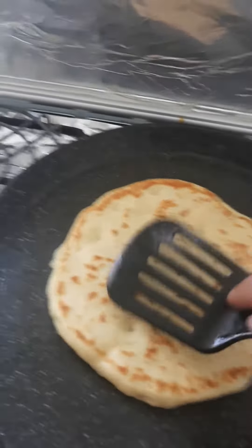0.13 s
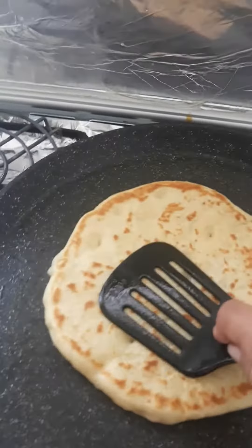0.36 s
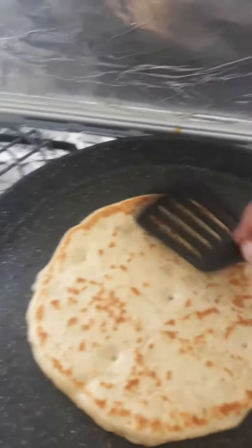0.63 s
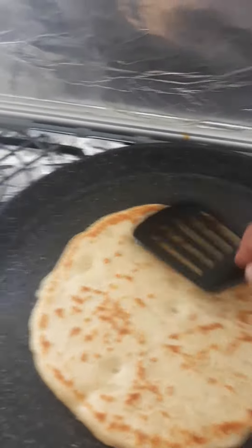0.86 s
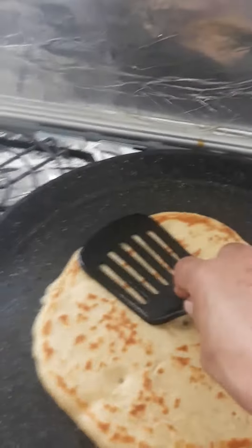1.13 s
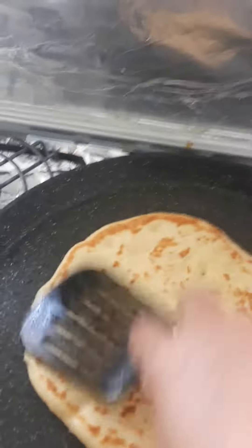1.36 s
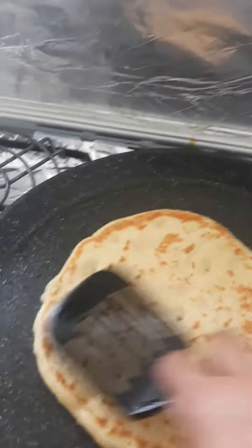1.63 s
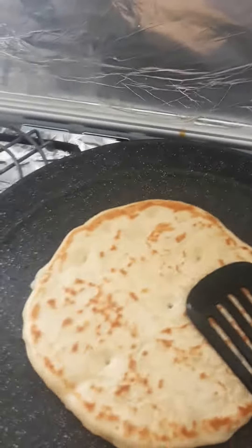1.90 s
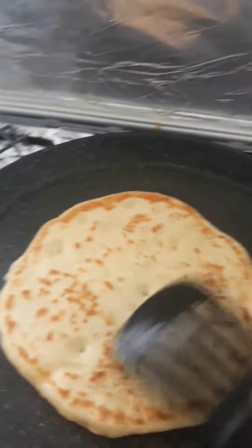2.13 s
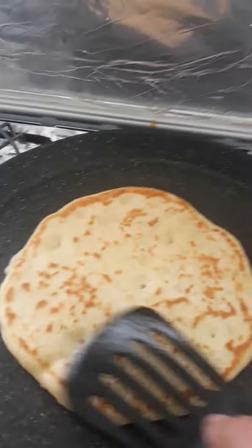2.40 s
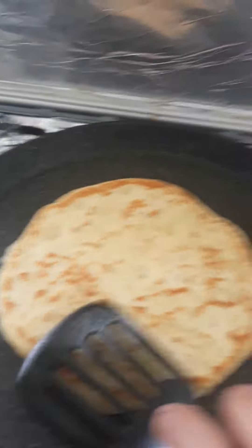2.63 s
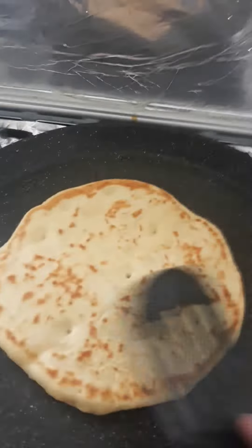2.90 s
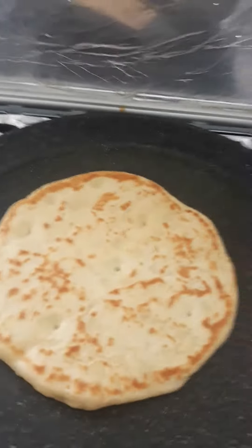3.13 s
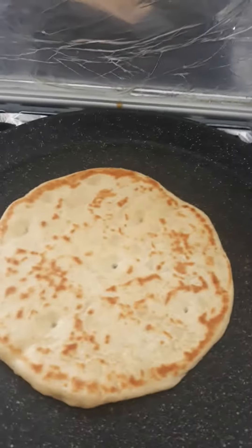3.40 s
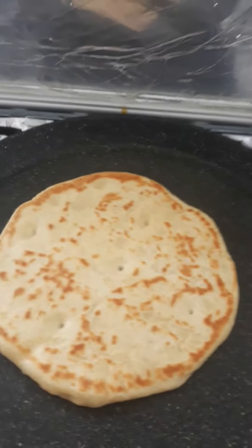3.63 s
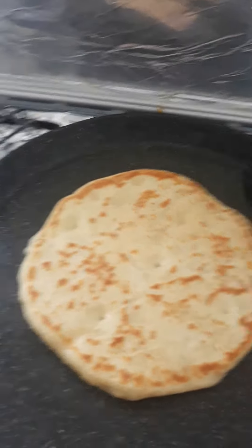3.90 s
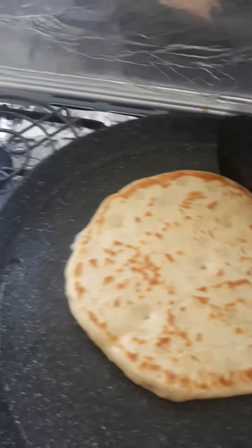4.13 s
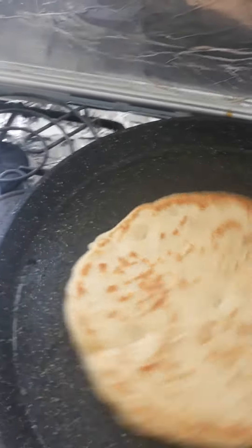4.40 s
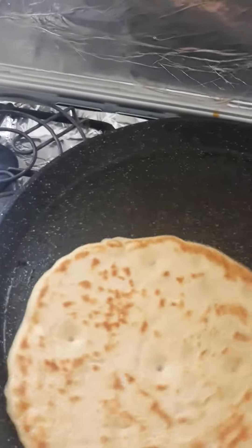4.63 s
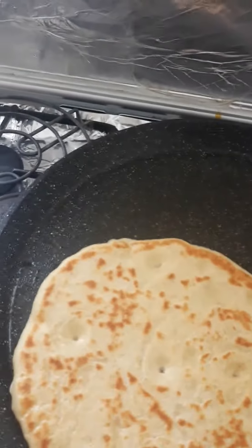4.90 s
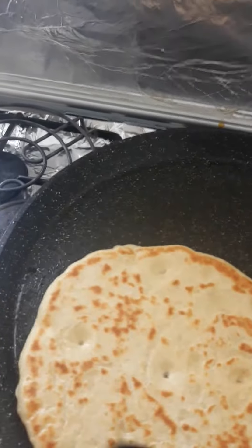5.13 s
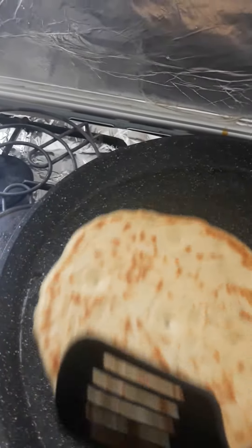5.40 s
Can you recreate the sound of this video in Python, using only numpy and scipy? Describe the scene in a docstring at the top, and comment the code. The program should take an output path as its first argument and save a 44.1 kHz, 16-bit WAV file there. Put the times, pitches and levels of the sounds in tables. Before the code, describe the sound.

Over a quiet steady gas burner, uneven spatula taps make a pan clack and ring briefly; later a jerk clangs it and the bread scrapes across.

```python
"""A gas burner roars and hisses in a small kitchen: two coloured noises share one slowly varying level.
A plastic spatula then pats a flatbread in a dry pan: the blade snaps on the crust (noise bursts), while the
pan rocks on its grate and rings (decaying modes); the hob top wobbles and blade and crust brush softly.
Then the pan is jerked: it knocks the grate and the bread slides over the coating (stick-slip noise)."""
import sys
import numpy as np
from scipy import signal
from scipy.fft import rfft, irfft, next_fast_len
from scipy.io import wavfile
from scipy.ndimage import uniform_filter1d, map_coordinates

SR = 44100
rng = np.random.default_rng(int(sys.argv[2]) if len(sys.argv) > 2 else 0)


def inscribe(sig):
    """Save sig as 16-bit PCM at rate SR to the path in sys.argv[1].

    A 1-D sig is mono; a 2-D sig holds one channel per row.
    Samples are clipped to [-1, 1] before scaling.
    """
    pcm = np.round(np.clip(np.atleast_2d(sig).T, -1, 1) * 32767)
    wavfile.write(sys.argv[1], SR, pcm.astype(np.int16))


def natural_amplitude(level_db):
    """Convert a level in decibels to a linear amplitude factor, elementwise."""
    exponent = np.asarray(level_db, float) / 20
    return 10 ** exponent


N = 243431


def unit(x):
    """Normalisation: the signal scaled to rms 1."""
    return x / np.sqrt(np.mean(x ** 2) + 1e-20)


def along(points, hz):
    """Logarithmic pitch: (frequency, value) points read on a log axis."""
    f, v = np.transpose(points)
    return np.interp(np.log(hz + 1), np.log(f + 1), v)


def curves(rows):
    """Linear interpolation: one value per sample for each column after the time."""
    s, *columns = np.transpose(rows)
    return [np.interp(np.arange(N) / SR, s, column) for column in columns]


def wobble(rate):
    """Band-limited fluctuation: a smooth random curve with rate knots a second."""
    knots = rng.standard_normal(int(N * rate / SR) + 4)
    return map_coordinates(knots, [np.arange(N) * rate / SR])


def coloured(x, spectrum):
    """Minimum-phase filtering: the folded cepstrum makes the given (frequency, dB) gain causal."""
    m = 2 * next_fast_len(x.shape[-1] // 2 + 4096)
    gain = natural_amplitude(along(spectrum, np.fft.rfftfreq(m, 1 / SR)))
    cepstrum = irfft(np.log(gain + 1e-6), m)
    cepstrum[1:m // 2] *= 2
    cepstrum[m // 2 + 1:] = 0
    return irfft(rfft(x, m) * np.exp(rfft(cepstrum)), m)[..., :x.shape[-1]]


def rush(spectrum, patchy_db):
    """Turbulence: noise of rms 1 whose gain varies at random in patches of time and frequency."""
    z = signal.stft(rng.standard_normal(N), nperseg=512)[2]
    field = uniform_filter1d(rng.standard_normal(z.shape), 5, 0)
    field = uniform_filter1d(field, 10, 1)
    patchy = signal.istft(z * natural_amplitude(patchy_db * unit(field)), nperseg=512)[1][:N]
    return unit(coloured(patchy, spectrum))


def grit(spread_db):
    """Stick-slip friction: dense tiny catches of unequal size."""
    size_db = spread_db * rng.standard_normal(N // 16 + 1).repeat(16)[:N]
    return unit(rng.standard_normal(N) * natural_amplitude(size_db))


# hiss level as heard from the moving microphone: (time [s], level [dB])
BURNER_LEVEL = [(0, -52.5), (.4, -52), (1.4, -50), (2.7, -50), (3.4, -50), (4.17, -51), (4.75, -54.5),
                (5.05, -53.5), (5.52, -47.5)]
# flame roar spectrum: (frequency [Hz], gain [dB])
ROAR_SPECTRUM = [(15, -36), (25, -11), (76, -8.5), (140, -5.5), (179, -7), (332, -3), (357, -11.5),
                 (393, -2), (560, -7), (800, -8), (1280, -14), (2200, -48.5), (2860, -37), (4840, -120)]
# gas jet spectrum: (frequency [Hz], gain [dB])
HISS_SPECTRUM = [(1060, -39.5), (1800, -7.5), (2310, -9), (2490, -6), (3130, -5.5), (3590, -1.5), (4240, 0),
                 (5150, -3.5), (6360, 0), (7440, -2.5), (8630, 1.5), (9640, -7), (14500, -4.5),
                 (15100, 0.5), (16300, -28.5)]
ROAR_DB = -3  # roar re hiss


def burner():
    """Turbulent combustion and jet noise: a low flame roar and steadier gas hiss follow one level."""
    level_db, = curves(BURNER_LEVEL)
    roar_db = level_db + ROAR_DB + .6 * wobble(7) + .8 * wobble(2)
    roar = natural_amplitude(roar_db) * rush(ROAR_SPECTRUM, patchy_db=1.3)
    hiss_db = level_db + 0.44 * wobble(5.38)
    return roar + natural_amplitude(hiss_db) * rush(HISS_SPECTRUM, patchy_db=1.0)


def ring(modes, t, weight_db, damping, attack, pressed_db=-40):
    """Modal decay: modes struck at random strengths die freely, plus a pressed part dying four times faster."""
    hz, db, t60 = np.transpose(modes)[:, :, None]
    strength, phase = rng.standard_normal((2, len(modes), 1))
    size = natural_amplitude(db + weight_db(hz) + 2 * strength)
    fall_db = -60 * t / (t60 * np.clip(damping, .05, 1.5))
    # pressed_db is the pressed part's starting level re the free part
    decay = (natural_amplitude(fall_db) + natural_amplitude(pressed_db + 4 * fall_db)) / (1 + natural_amplitude(pressed_db))
    tones = size * decay * np.sin(2 * np.pi * hz * t + .3 * phase)
    return tones.sum(0) / np.linalg.norm(size) * (1 - np.exp(-t / attack))


def chatter(x, t, level_db, t60):
    """Repeated impact: a blow is followed by a quick blur of smaller rebounds."""
    blows = natural_amplitude(level_db - 60 * t / t60) * rng.standard_normal(len(t))
    blows[0] = 1
    return signal.fftconvolve(x, blows / np.linalg.norm(blows))[:len(t)]


# a small pan sends out little bass: (frequency [Hz], gain [dB])
SMALL_RADIATOR = [(40, -35), (120, -33), (190, 0)]


def radiated(x):
    """Radiation efficiency: a source small beside the wavelength radiates weakly."""
    return coloured(x, SMALL_RADIATOR)


# the pan floor bumping on the grate, level before radiation:
# (time [s], level [dB], centre [Hz], share of free ringing time [0-1])
FLOOR_BUMPS = [(0.214, -19, 600, 0.09), (0.26, -28, 640, 0.13), (0.282, -28, 252, 0.13),
               (0.324, -31, 302, 0.7), (0.423, -22, 227, 0.75), (0.445, -19, 270, 0.47),
               (0.462, -25, 233, 0.54), (0.703, -24, 357, 0.42), (0.734, -32.5, 242, 0.72),
               (1.074, -13, 368, 0.12), (1.101, -32.5, 207, 0.28), (1.442, -34.5, 253, 0.6),
               (1.469, -26, 589, 0.32), (1.486, -5.5, 614, 0.52), (1.496, -9, 242, 0.63),
               (1.513, -10, 234, 0.23), (1.627, -9.5, 328, 0.67), (1.65, -9.5, 212, 0.14),
               (1.692, -19, 405, 0.43), (1.826, -34, 248, 0.5), (1.871, -19.5, 307, 0.16),
               (1.893, -26.5, 274, 0.6), (2.244, -21.5, 418, 0.17), (2.267, -25.5, 256, 0.27),
               (2.36, -24, 233, 0.18), (2.52, -28.5, 302, 0.3), (2.582, -22, 320, 0.55),
               (2.619, -23.5, 284, 0.19), (2.714, -17, 250, 0.06), (2.777, -20, 250, 0.74),
               (2.813, -20, 220, 0.67), (2.842, -33, 220, 0.1), (2.988, -29.5, 234, 0.15),
               (3.26, -31.5, 330, 0.13), (4.106, -37, 383, 0.4), (4.191, -9.5, 330, 0.32),
               (4.202, -13, 206, 1), (5.029, -20, 420, 0.44), (5.057, -16.5, 330, 0.12),
               (5.098, -23.5, 235, 0.3), (5.113, -31.5, 255, 0.95), (5.189, -28.5, 458, 0.49),
               (5.233, -27.5, 243, 0.5), (5.274, -29.5, 232, 0.38)]
# bending of the pan floor on the grate: (frequency [Hz], level [dB], free t60 [s])
FLOOR_MODES = [(214, -6, .55), (237, 0, .32), (258, -4, .3), (302, -7, .3), (356, -4, .3), (399, -6, .3),
               (425, -5, .3), (538, -6, .35), (570, -7, .2), (628, -5, .2), (672, -2, .27), (760, -11, .2),
               (870, -9, .2)]
# modes fall away from a bump's centre, more steeply for a flat landing on the lowest modes:
# dB per octave at 250 Hz, its inverse power of pitch
NARROW_DB, NARROW_SHRINKS = 11, .45


def bumps():
    """Plate bending: each bump excites the pan floor's modes, most near its centre pitch."""
    out, t = np.zeros(N + SR), np.arange(SR // 2) / SR
    for s, db, centre_hz, free in FLOOR_BUMPS:
        narrow_db = NARROW_DB * (250 / centre_hz) ** NARROW_SHRINKS
        near = lambda hz: -narrow_db * np.abs(np.log2(hz / centre_hz))
        boom = ring(FLOOR_MODES, t, near, free, attack=.0025, pressed_db=-3)
        out[round(s * SR):][:len(t)] += natural_amplitude(db) * chatter(boom, t, level_db=-38, t60=.05)
    return radiated(out[:N])


# wall and rim of the pan: (frequency [Hz], level when tapped from above [dB],
# level when knocked on the grate [dB], free t60 [s])
WALL_MODES = [(970, -8, -14, .2), (1065, -8, -12, .2), (1219, -9, -4, .24), (1450, -8, -11, .1),
              (1633, -18, -18, .25), (1717, -12, -8, .16), (1772, -2, 0, .16), (1848, -10, -5, .22),
              (1995, -13, -10, .2), (2110, -14, -16, .5), (2246, -13, 3, .24), (2396, -12, -13, .2),
              (2537, -4, -7, .27), (2669, -6, -8, .13), (2945, -5, -4, .15), (3289, -9, -13, .2),
              (3610, -6, -12, .24), (3730, -10, -12, .18), (4065, -11, -15, .2), (4420, -14, -12, .2),
              (4660, -12, -18, .18), (4920, -14, -20, .18), (5570, -16, -18, .16)]


def pan_modes(knocked):
    """Point of excitation: modal levels shift between a tap from above (0) and a grate knock (1)."""
    return [(hz, tap_db + knocked * (knock_db - tap_db), t60) for hz, tap_db, knock_db, t60 in WALL_MODES]


# blade and rim contacts, levels before the mixing gains below: (time [s], level [dB],
# clang re snap [dB], clang centre [Hz], tick re snap [dB])
BLADE_CONTACTS = [(0.2148, -34, -2.5, 1510, -20), (0.2604, -38, -1, 1550, -17),
                  (0.2804, -29, -6, 1610, -22), (0.325, -34, 4.5, 2480, -22),
                  (0.4229, -18, -2.5, 2770, -15), (0.4453, -22, 1, 2640, -17), (0.4838, -34, 2.5, 2100, -6),
                  (0.7036, -29, -1, 1080, -7), (0.7348, -27, 2, 1120, -26), (1.0717, -23.5, 7, 1090, -4),
                  (1.0779, -30.5, 10.5, 1040, -20), (1.0982, -30, -2, 1000, -24),
                  (1.4417, -29, -15, 1870, -17), (1.4783, -30, -1, 1390, -19), (1.487, -13, 9, 2150, -39),
                  (1.5138, -27, 14, 1060, -27), (1.6027, -42, -2, 1430, -4),
                  (1.6255, -6.5, -0.5, 2650, -22), (1.6518, -12.5, 2.5, 2440, -17),
                  (1.8735, -22.5, 0, 990, -15), (1.8952, -25, -12, 2630, -17), (1.934, -35, -15, 2640, -9),
                  (2.2463, -18.5, -23, 1000, -19), (2.2515, -23.5, -22, 1530, -7.5),
                  (2.2666, -30.5, -4, 1250, -18), (2.3304, -34.5, -16, 2340, -5.5),
                  (2.3413, -44, -14, 2030, -5), (2.5241, -21.5, -17, 1090, -20),
                  (2.5834, -20.5, 2, 2590, -26.5), (2.7145, -29, -5, 1500, -18),
                  (2.725, -28, -2, 1740, -27), (2.7369, -37, 10, 1110, -16),
                  (2.7768, -15.5, 0.5, 2620, -16.5), (3.239, -31, 6.5, 990, -11),
                  (3.2597, -35, -1, 1010, -13), (4.13, -38.5, 8, 1380, -11), (4.187, -13, 11.5, 1640, -30),
                  (4.2011, -15, 0, 1810, -17), (5.0255, -33.5, 0.5, 1830, -24)]
# the snap of blade on crust: (frequency [Hz], gain [dB])
SNAP_SPECTRUM = [(350, -29.5), (600, 5.5), (1200, -7.5), (2160, -5.5), (2710, -8), (5420, -8.5),
                 (8280, -16), (10000, -30), (13000, -44), (22000, -120)]
# the brittle top of the snap: (frequency [Hz], gain [dB])
TICK_SPECTRUM = [(5000, -27), (8500, 8.5), (10000, -4.5), (15500, -3), (16500, -32)]
# the plastic blade: (frequency [Hz], level [dB], t60 before damping [s])
BLADE_MODES = [(1500, -1, 0.024), (2620, 0.5, 0.024), (2950, -18, 0.037), (3000, -15, 0.064),
               (4150, -5, 0.061), (4720, -7, 0.053)]
# a dull contact presses into the bread and is damped, a bright one near the rim rings:
# share of free ringing at 1 kHz, its power of pitch, share once the pan is jerked free of the blade
FREE_AT_1K, FREE_GROWS, FREE_JERKED, JERK_S = 0.21, 0.93, 0.7, 4.15
# a heavy press stays down: dB of ringing time lost per dB of clang re snap
HEAVY_DAMPS = 0.31


def contacts():
    """Impact excitation: a rattling snap and brittle tick, with blade clack and pan clang near a centre pitch."""
    out, t = np.zeros(N + SR), np.arange(SR // 2) / SR
    noise = rng.standard_normal((len(BLADE_CONTACTS), 2, len(t)))
    rows = np.array(BLADE_CONTACTS)
    times, clangs_db, centres_hz = rows[:, :1], rows[:, 2:3], rows[:, 3:4]
    heavy = natural_amplitude(-HEAVY_DAMPS * np.clip(clangs_db, 0, 20))
    frees_pressed = FREE_AT_1K * (centres_hz / 1000) ** FREE_GROWS * heavy
    frees = np.where(times > JERK_S, FREE_JERKED, frees_pressed)
    tail = natural_amplitude(-7.5 - 60 * t / (0.22 * np.clip(frees, .05, 1.5)))
    snaps = coloured(noise[:, 0] * (natural_amplitude(-60 * t / 0.0084) + tail), SNAP_SPECTRUM)
    tick_decay = natural_amplitude(-60 * t / .006) + tail * natural_amplitude(-60 * t / 0.2)
    ticks = coloured(noise[:, 1] * tick_decay, TICK_SPECTRUM)
    for row, (free,), snap, tick in zip(BLADE_CONTACTS, frees, snaps, ticks):
        s, db, clang_db, centre_hz, tick_db = row
        # a clang far above the snap of a jerked pan comes from the grate
        knocked = np.clip(clang_db / 12, 0, 1) * (s > JERK_S)
        near = lambda hz: -7 * np.abs(np.log2(hz / centre_hz))
        clang = ring(pan_modes(knocked), t, near, free, attack=.0002, pressed_db=13)
        clack = ring(BLADE_MODES, t, near, 2 * free, attack=0.001)
        hit = natural_amplitude(0.5) * snap / np.abs(snap).max()
        hit = hit + natural_amplitude(tick_db + 7.0) * tick / np.abs(tick).max()
        hit = hit + natural_amplitude(-5.0) * clack
        hit = hit + natural_amplitude(clang_db - 1.5) * chatter(clang, t, level_db=-34, t60=.04)
        out[round(s * SR):][:len(t)] += natural_amplitude(db) * hit
    return out[:N]


# the hob top shaken by the harder presses: (time [s], level before a 5 dB lift [dB], frequency [Hz])
HOB_THUMPS = [(0.422, -44, 133), (1.071, -42, 136), (1.482, -31, 138), (1.529, -41, 91.5),
              (1.654, -38.5, 91.5), (1.871, -42.5, 132), (2.244, -40, 129), (2.355, -41.5, 124),
              (2.585, -50, 136), (2.614, -50, 103), (2.777, -46, 135), (2.843, -52, 121),
              (2.987, -47.5, 135)]


def thumps():
    """Forced panel vibration: the sheet-metal top swells into a low wobble with a deeper undertone."""
    out, t = np.zeros(N + SR), np.arange(SR // 2) / SR
    for s, db, hz in HOB_THUMPS:
        swell = (1 - np.exp(-t / 0.0037)) ** 2 * natural_amplitude(db + 5.0 - 60 * t / .18)  # t60 0.18 s
        undertone = natural_amplitude(-8.5) * np.sin(2 * np.pi * 0.59 * hz * t)
        out[round(s * SR):][:len(t)] += swell * (np.sin(2 * np.pi * hz * t) + undertone)
    return out[:N]


def bell(s, length):
    """Envelope shaping: a soft swell, quicker up than down."""
    progress = np.clip((np.arange(N) / SR - s) / max(length, .005), 0, 1)
    return np.sin(np.pi * progress ** 0.57) ** 2


# soft brushes of blade on crust, and last a longer crumb fizz as the bread slides again,
# level before an 11.5 dB cut: (time [s], level [dB], fizz re scrape [dB], length [s])
SOFT_BRUSHES = [(0.7095, -29.5, -11, 0.033), (0.8965, -38, 3.5, 0.028), (1.084, -26.5, -21, 0.039),
                (1.261, -36.5, -11, 0.054), (1.4223, -32.5, -3.5, 0.029), (1.443, -31, -10, 0.038),
                (1.9, -33, -6, 0.03), (2.059, -33, 3.5, 0.02), (2.27, -33.5, -14, 0.022),
                (2.353, -41.5, -13, 0.023), (4.107, -38, -9, 0.026), (5.092, -53, 17.5, 0.25)]
# bread sliding: (start [s], speeding up [s], slowing [s], level [dB])
BREAD_SLIDES = [(4.198, 0.31, 0.15, -36), (5.049, 0.39, 0.42, -39)]
# gain while speeding up, loss while slowing, fall as it stops
SLIDE_RISE_DB, SLIDE_SAG_DB, HALT_DB_PER_S = 19, 5, 329.5
# fizz re scrape, trailing it; factor on the scrape's swing in dB
CRUMB_DB, CRUMB_LAG_S, CRUMB_GROWS = -12, 0.092, 0.95


def strokes():
    """Speed-dependent friction: scrape and fizz strengths; slides rise, slow and halt, soft swells add to them."""
    out, t = np.zeros((2, N)), np.arange(N) / SR
    for s, rise, slow, db in BREAD_SLIDES:
        stop = s + rise + slow
        knots = [s, s + rise, stop, stop + 1]
        gains_db = [-SLIDE_RISE_DB, 0, -SLIDE_SAG_DB, -HALT_DB_PER_S]
        scrape_db = np.interp(t, knots, gains_db)
        halt_db = -HALT_DB_PER_S * np.clip(t - stop, 0, 1)
        fizz_db = CRUMB_DB + CRUMB_GROWS * np.interp(t - CRUMB_LAG_S, knots, gains_db) + halt_db
        out += (t > s) * natural_amplitude(db + np.array([scrape_db, fizz_db]))
    for s, db, fizz_db, length in SOFT_BRUSHES:
        out += bell(s, length) * natural_amplitude(db - 11.5 + np.array([[0], [fizz_db]]))
    return out


# floor resonances under the slide: (frequency [Hz], decay rate [13 dB/s], level [dB])
JUDDER_MODES = [(433, 22, -4), (490, 40, 3), (529, 40, 0)]
# peak time, level before radiation, rise and fall in dB per s
SHAKE_S, SHAKE_DB, SHAKE_RISE_DB, SHAKE_FALL_DB = 4.43, -36, 72, 120.5


def judder():
    """Friction-driven resonance: uneven catches shake damped pan floor modes under the first slide."""
    t = np.arange(SR // 4) / SR
    floor = sum(natural_amplitude(db - 13 * rate * t) * np.sin(2 * np.pi * hz * t) for hz, rate, db in JUDDER_MODES)
    catches = grit(spread_db=4.5) * natural_amplitude(6.1 * wobble(35))
    shaking = unit(signal.fftconvolve(catches, floor)[:N])
    late = np.arange(N) / SR - SHAKE_S
    shake_db = SHAKE_DB + np.minimum(SHAKE_RISE_DB * late, -SHAKE_FALL_DB * late)
    return natural_amplitude(shake_db) * radiated(shaking)


# crust scraping on coating or blade: (frequency [Hz], gain [dB])
SCRAPE_SPECTRUM = [(88, -72.5), (150, -26), (259, 2.5), (298, -11), (692, -7.5), (916, -12.5), (1110, -8),
                   (3030, -10.5), (7420, -20), (8690, -18.5), (10000, -42.5), (13000, -59.5), (22000, -120)]
# loose crumbs: (frequency [Hz], gain [dB])
FIZZ_SPECTRUM = [(4000, -9), (7000, -3.5), (9000, -1), (10500, -8.5), (12500, -4.5), (15700, -10.5),
                 (16000, -59)]


def slide():
    """Stick-slip: dry crust catches on coating or blade and feeds the pan's modes; crumbs fizz, the floor judders."""
    catches = grit(spread_db=3) * natural_amplitude(.7 * wobble(40))
    t = np.arange(SR // 4) / SR
    body = ring(pan_modes(.5), t, lambda hz: 0, damping=.35, attack=.0005)
    scrape = unit(coloured(catches, SCRAPE_SPECTRUM))
    scrape = scrape + natural_amplitude(-9) * unit(signal.fftconvolve(catches, body)[:N])
    fizz = natural_amplitude(1.5) * unit(coloured(grit(spread_db=2.0), FIZZ_SPECTRUM))
    scrape_gain, fizz_gain = strokes()
    return scrape_gain * scrape + fizz_gain * fizz + judder()


# a soft low rub nearby: (frequency [Hz], gain [dB])
RUB_SPECTRUM = [(300, -28), (600, 0), (750, -4), (950, -7), (1500, -32)]
RUB_S, RUB_LENGTH_S, RUB_DB = 3.39, 0.14, -50


def rub():
    """Sliding friction: one soft, dull rub of low noise under a swell."""
    return natural_amplitude(RUB_DB) * bell(RUB_S, RUB_LENGTH_S) * rush(RUB_SPECTRUM, patchy_db=3.0)


# reverberation of the small kitchen: (frequency [Hz], t60 [s])
KITCHEN_DECAY = [(150, 0.48), (1000, 0.43), (4000, 0.24), (12000, 0.098)]


def kitchen(x):
    """Reverberation: each frequency dies at its own speed, with a new tail every quarter second."""
    out, step = np.zeros(N + 2 * SR), SR // 4
    for i in range(0, N, step):
        hz, t, z = signal.stft(rng.standard_normal(SR // 2), SR, nperseg=256)
        decay = natural_amplitude(-60 * t / along(KITCHEN_DECAY, hz)[:, None])
        tail = signal.istft(z * decay, SR, nperseg=256)[1]
        wet = signal.fftconvolve(x[i:i + step], tail / np.linalg.norm(tail))
        out[i + 130:][:len(wet)] += wet  # the room answers 3 ms late
    return out[:N]


def scene():
    """Superposition: pan sounds and their reverberation add to the burner."""
    pan = contacts() + bumps() + thumps() + slide() + rub()
    return (pan + natural_amplitude(-11) * kitchen(pan) + burner())[None]


# phone microphone response: (frequency [Hz], gain [dB])
MIC_RESPONSE = [(15, -26.5), (40, -7), (80, -0.5)]


def microphone(x):
    """Transducer response: a phone microphone is deaf to the deepest bass."""
    return coloured(x, MIC_RESPONSE)


def roll_off(x):
    """The treble ends steeply here."""
    return signal.sosfilt(signal.butter(12, 17000, fs=SR, output="sos"), x)


def record(dry):
    """Sound capture: the finished mix is the scene as the microphone hears it."""
    mix = microphone(dry)
    return roll_off(mix)


dry = scene()
out = record(dry)
inscribe(out)
```